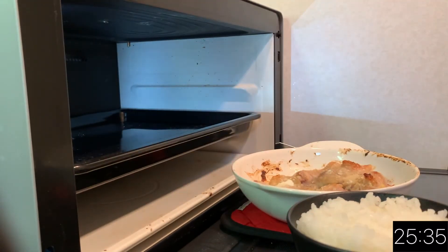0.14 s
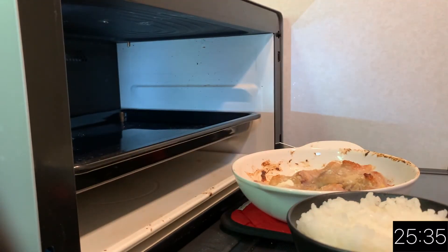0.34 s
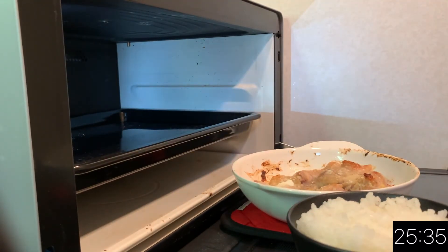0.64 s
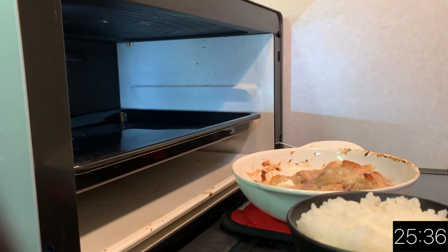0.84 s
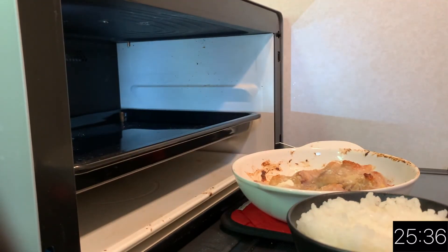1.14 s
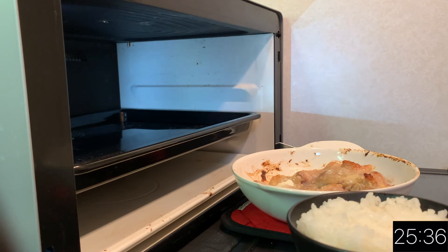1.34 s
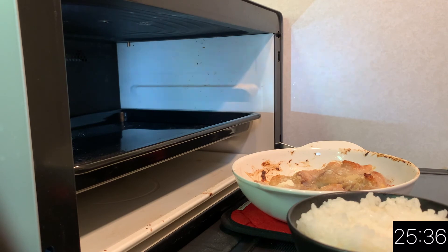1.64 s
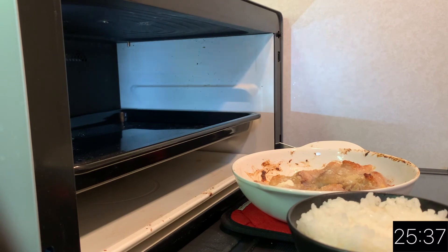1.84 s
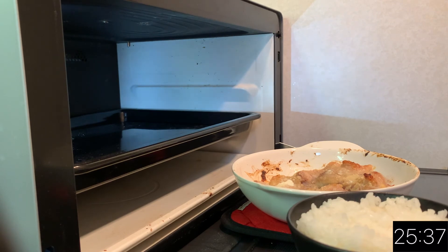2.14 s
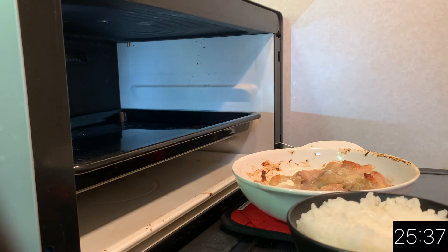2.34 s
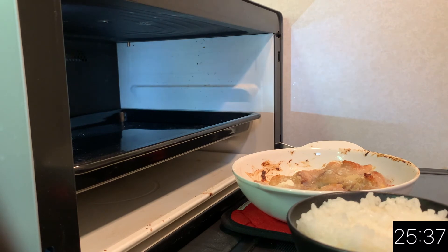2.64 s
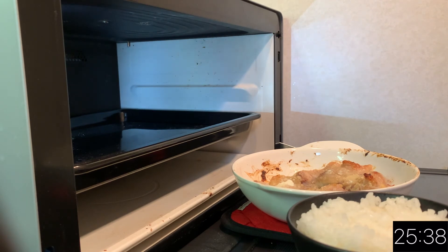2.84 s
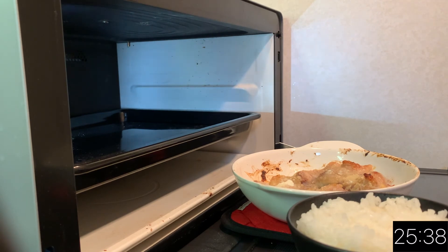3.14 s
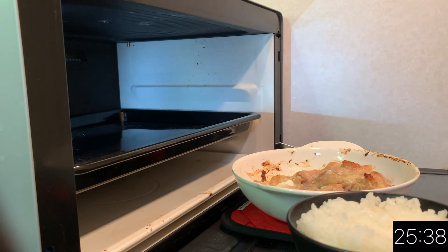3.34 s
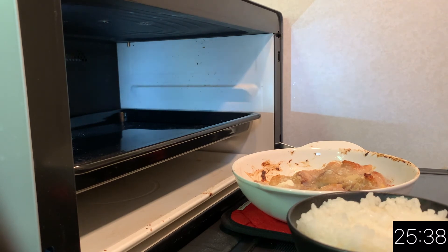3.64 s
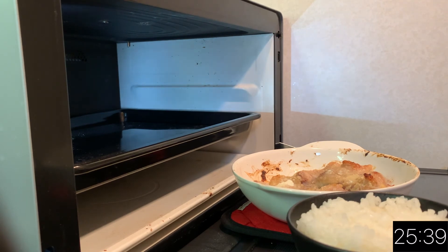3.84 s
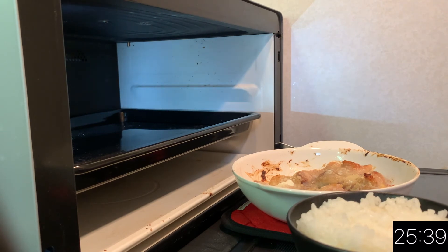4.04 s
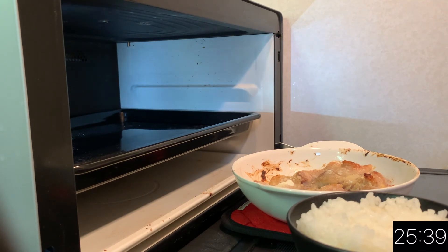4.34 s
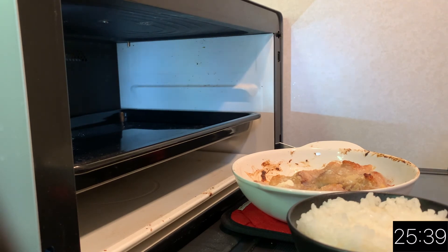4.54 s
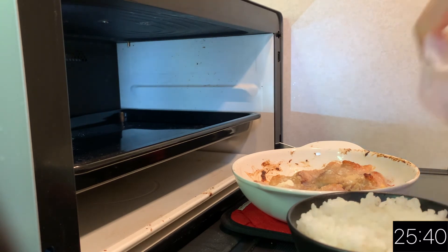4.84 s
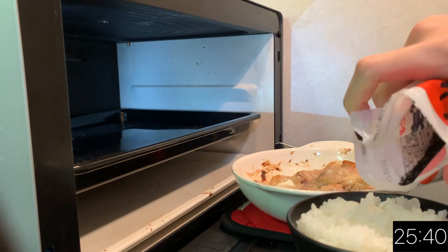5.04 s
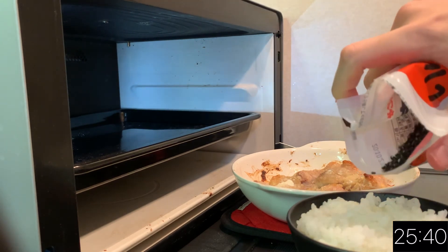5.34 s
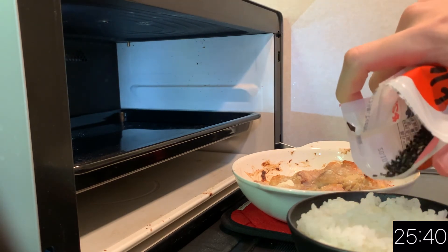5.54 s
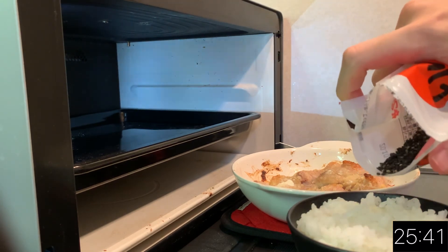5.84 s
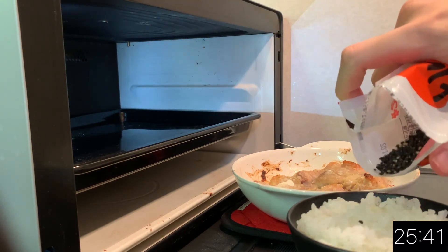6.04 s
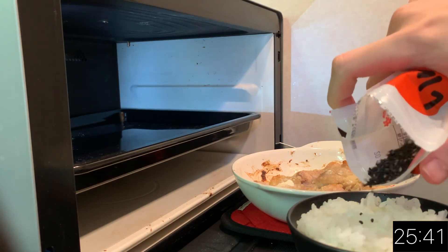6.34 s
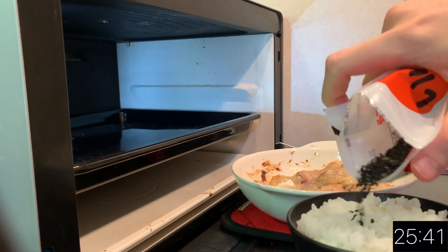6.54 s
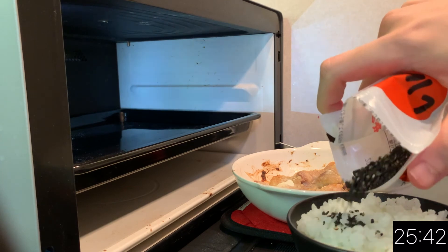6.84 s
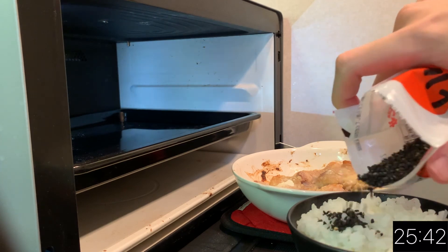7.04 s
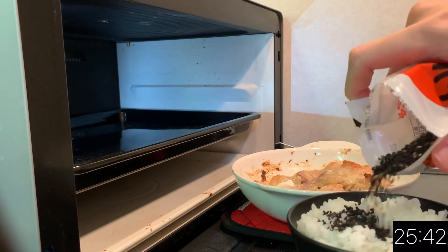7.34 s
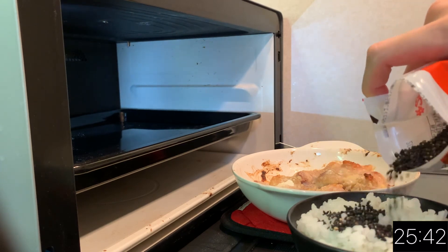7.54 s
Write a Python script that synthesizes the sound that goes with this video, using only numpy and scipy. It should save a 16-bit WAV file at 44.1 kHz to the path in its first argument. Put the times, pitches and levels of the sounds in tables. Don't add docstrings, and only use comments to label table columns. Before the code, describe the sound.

Crisp plastic film snaps, pops and gets crumpled hard, followed by faint shaking of dry seasoning, with low motor hum and fan noise behind.

```python
import sys
import numpy as np
from scipy import signal
from scipy.fft import rfft, irfft, next_fast_len
from scipy.io import wavfile
from scipy.ndimage import uniform_filter1d, minimum_filter1d

SR = 44100
rng = np.random.default_rng(int(sys.argv[2]) if len(sys.argv) > 2 else 0)


def master_out(mix):
    frames = np.transpose(np.atleast_2d(mix))
    ceiling = np.clip(frames, -1, 1)
    pcm = np.round(ceiling * 32767).astype(np.int16)
    wavfile.write(sys.argv[1], SR, pcm)


def invert_db(x):
    u = np.asarray(x, float) / 20
    return 10 ** u


N = 338688
POUR_FROM_S = 4.78


def rms_one(x):
    return x / np.sqrt(np.mean(x ** 2) + 1e-20)


def in_time(rows):
    s, *columns = np.transpose(rows)
    return [np.interp(np.arange(N) / SR, s, c) for c in columns]


def at_hz(points, hz):
    point_hz, value = np.array(points)[:, 0], np.array(points)[:, 1]
    return np.interp(np.log(hz), np.log(point_hz), value)


def drift(rate_hz):
    r = np.exp(-80 * np.pi * rate_hz / SR)
    white = rng.standard_normal(N // 40 + 2002)
    slow = signal.lfilter([1], [1, -2 * r, r * r], white)[2000:]
    return np.interp(np.arange(N) / 40, np.arange(len(slow)), rms_one(slow))


def ring(clicks, hz, t60):
    r, w = invert_db(-60 / (t60 * SR)), 2 * np.pi * hz / SR
    return signal.lfilter([0, np.sin(w)], [1, -2 * r * np.cos(w), r * r], clicks + 1e-18)


def band(x, low_hz, high_hz):
    edges = [low_hz, min(high_hz, .45 * SR)]
    return signal.sosfilt(signal.butter(2, edges, "band", fs=SR, output="sos"), x)


def stereo_bands(size, low_hz, likeness):
    edges = low_hz * 2 ** np.arange(0, np.log2(17000 / low_hz) + .5, .5)
    white = rng.standard_normal((2, 2, size))
    for k, (low, high) in enumerate(zip(edges, edges[1:])):
        mid, side = band(white[k % 2], low, high)
        hz = np.sqrt(low * high)
        alike = np.clip(at_hz(likeness, hz), -1, 1)
        yield hz, np.sqrt(1 + alike) * mid + np.sqrt(1 - alike) * side * [[1], [-1]]


def panned(x, db):
    return x * np.array([invert_db(db / 2), invert_db(-db / 2)]).reshape(2, -1)


# frequency in Hz, level in dB per Hz.
FAN_SPECTRUM = [(30, 6.5), (50, 1), (90, 1.5), (130, 0.5), (170, -2.5), (250, -5.5), (370, -1), (560, -31),
                (720, -10), (1200, -11), (1500, -17.5), (1900, -28.5), (4000, -27), (9000, -86),
                (16000, -93)]
# frequency in Hz, likeness from -1 to 1.
FAN_LIKENESS = [(40, 0.98), (90, 0.89), (150, 0.84), (280, 0.82), (500, 0.28), (1000, 1), (2380, -0.45),
                (8000, -0.1)]
# frequency in Hz, left over right in dB.
FAN_BALANCE = [(60, 2), (180, 2.5), (300, 3), (550, -8.5), (1200, -0.5), (4970, -1), (15000, -2)]


def fan():
    out = 0
    for hz, pair in stereo_bands(N, 26.97, FAN_LIKENESS):
        lean_db = at_hz(FAN_BALANCE, hz) / 2
        flicker_db = 2.14 * drift(25.0)
        out = out + pair * invert_db(at_hz(FAN_SPECTRUM, hz) + flicker_db) * invert_db([[lean_db], [-lean_db]])
    return invert_db(-47.5) * rms_one(out)


# frequency in Hz, width in Hz, rms level in dB.
DUCTS = [(399, 27, -70.5), (713.8, 39, -58), (1026, 9.9, -62.5), (1160, 8.7, -90), (1250, 8.4, -75),
         (2230, 24, -72)]


def ducts():
    white = rng.standard_normal((2, N))
    sung = sum(invert_db(db) * rms_one(ring(white, hz, 2.7 / width_hz)) for hz, width_hz, db in DUCTS)
    return np.array([0.59 * sung[0] + .5 * sung[1], 0.69 * sung[1] - 0.064 * sung[0]])


# frequency in Hz, left in dB, right in dB, left lead in radians.
MOTOR_TONES = [(191.9, -47, -53, -1.1), (319.6, -55, -57, .1), (335.85, -63, -63, -.1),
               (671.7, -67, -67, .6), (1343.2, -64, -61, .5)]
# time in seconds, left in dB, right in dB, left lead in radians.
SECOND_MOTOR = [(0, -52, -63, 3.6), (1.3, -53, -66, 3.4), (2.9, -57, -59, 3.0), (3.7, -55, -57, 1.7),
                (4.5, -49.5, -56, 1.1), (5.3, -47.5, -55, .8), (7.68, -47, -54.5, .6)]


def motors():
    first_throb_s, second_hz = .049, 182.62
    t = np.arange(N) / SR - first_throb_s
    out = np.zeros((2, N))
    for hz, left_db, right_db, lead in [*MOTOR_TONES, (second_hz, *in_time(SECOND_MOTOR))]:
        phase = 2 * np.pi * hz * t
        sway = np.sqrt(2) * invert_db(.4 * drift(.6))
        out += sway * [invert_db(left_db) * np.cos(phase), invert_db(right_db) * np.cos(phase - lead)]
    return out


BUMP_S = [1.772, 1.812, 1.945, 1.724, 1.112, 1.175, 1.19]
# frequency in Hz, peak in dB, t60 in seconds.
BUMP_RINGS = [
    (57.4, -22, 0.16),
    (50, -29, 0.15),
    (53.3, -39, 0.18),
    (650, -37.5, 0.15),
    (89, -40.5, 0.078),
    (378, -31, 0.12),
    (101, -32, 0.064),
]


def bumps():
    out = np.zeros(N)
    for s, (hz, db, t60) in zip(BUMP_S, BUMP_RINGS):
        push = np.hanning(round(.5 * SR / hz))
        rung = ring(np.pad(push, (0, SR // 2)), hz, t60)
        i = round(s * SR)
        out[i:i + len(rung)] += invert_db(db) * rung / np.abs(rung).max()
    return panned(out, 3.0)


# frequency in Hz, likeness from -1 to 1.
ECHO_LIKENESS = [(300, .2), (700, -.7), (1500, -.5), (3000, -.1), (6500, .6), (15000, .75)]
# frequency in Hz, t60 in seconds.
KITCHEN_T60 = [(300, 0.022), (2000, 0.23), (6000, 0.11), (15000, 0.0098)]


def echo_pattern():
    t = np.arange(round(.4 * SR)) / SR
    onset = np.clip((t - .0015) / 0.000073, 0, 1)
    bands = stereo_bands(len(t), 249.4, ECHO_LIKENESS)
    tail = onset * sum(pair * invert_db(-60 * t / at_hz(KITCHEN_T60, hz)) for hz, pair in bands)
    tail = tail + 1.8 * tail * np.exp(-t / .006)
    return tail / np.sqrt(np.sum(tail ** 2) / 2)


def kitchen(x):
    place = (np.arange(N) // round(.06 * SR)) % 4
    out = 0
    for k in range(4):
        here = (x * (place == k))[None]
        out = out + signal.fftconvolve(here, echo_pattern(), axes=1)[:, :N]
    return out


# peak in seconds, crackle in dB, rise
# in ms over 20 dB, fall in ms over 20 dB.
SQUEEZES = [(.01, -47.5, 96, 63), (0.171, -44, 65, 115), (.44, -50, 56, 114), (.56, -49.5, 130, 104),
            (.625, -50, 40, 82), (.735, -53.5, 28, 77), (0.886, -42.5, 14, 48), (1.02, -55, 50, 55),
            (1.11, -38.5, 106, 122), (1.188, -32, 134, 99), (1.36, -50, 69, 85), (1.49, -51.5, 72, 87),
            (1.64, -50, 110, 114), (1.731, -36.5, 30, 120), (1.86, -53, 37, 85), (1.95, -49.5, 27, 188),
            (2.13, -64, 500, 102), (2.232, -46, 13, 173), (2.379, -55, 40, 111), (2.605, -57.5, 51, 61),
            (2.736, -46.5, 27, 110), (2.86, -48, 16, 63), (2.96, -55.5, 58, 80),
            (3.045, -33.5, 25, 40), (3.079, -37, 46, 120), (3.167, -46, 47, 48), (3.2, -44, 200, 170),
          (3.35, -39, 70, 280), (3.481, -39.5, 52, 163), (3.62, -50.5, 81, 210), (3.76, -41, 76, 140),
          (3.929, -37, 12, 40), (3.945, -36.5, 37, 112), (4.02, -51, 40, 180), (4.09, -44.5, 23, 160),
          (4.19, -42.5, 59, 28), (4.249, -34, 44, 102), (4.389, -36.5, 24, 13), (4.448, -44.5, 100, 300),
          (4.559, -43, 160, 36), (4.69, -53, 30, 48)]
# start in seconds, crackle in dB, seconds sliding.
SHAKES = [(4.78, -44.5, 0.15), (4.879, -49.5, 0.3), (5.231, -52.5, 0.3), (5.619, -59, 0.15),
          (5.901, -55.5, 0.16), (6.078, -52, 0.11), (6.28, -56.5, 0.037), (6.461, -51, 0.35),
          (6.822, -56.5, 0.13), (7.07, -53.5, 0.095), (7.231, -53, 0.13), (7.45, -59, 0.13),
          (7.61, -58, .1)]


def effort():
    settle_power = 1.29
    rise_db_per_s, sag_db_per_s, fall_db_per_s = 380, 18, 192
    t = np.arange(0, N, 32) / SR
    squeeze, slide = 0, 0
    for s, db, rise_ms, fall_ms in SQUEEZES:
        before = np.maximum(s - t, 0) * 1000 / rise_ms
        after = np.maximum(t - s, 0) * 1000 / fall_ms
        squeeze = squeeze + invert_db(db - 20 * (before + after ** settle_power)) ** 2
    for s, db, length in SHAKES:
        rise_db = rise_db_per_s * np.maximum(s - t, 0)
        sag_db = sag_db_per_s * np.clip(t - s, 0, length)
        fall_db = fall_db_per_s * np.maximum(t - s - length, 0)
        slide = slide + invert_db(db - rise_db - sag_db - fall_db) ** 2
    return [np.interp(np.arange(N) / SR, t, np.sqrt(power)) for power in (squeeze, slide)]


def crackle(pitches, per_s, spread_db, cycles):
    pouring = np.arange(N) > POUR_FROM_S * SR
    evenness, crowd = np.where(pouring, .45, 1), np.where(pouring, 4, 1)
    sizes_db = evenness * spread_db * np.minimum(rng.exponential(1, N), 4)
    sizes = invert_db(sizes_db) * rng.choice([-1, 1], N)
    born = rng.random(N) < crowd * per_s * invert_db(5 * evenness * drift(30)) / SR
    dealt = rng.integers(0, len(pitches), N)
    out = 0
    for k, hz in enumerate(pitches):
        rung = ring(sizes * born * (dealt == k), hz, cycles / hz)
        out = out + hz ** 0.81 * panned(rung, rng.normal(0, 2.5))
    return rms_one(out)


def handling():
    squeeze, slide = effort()
    pouring = np.arange(N) > POUR_FROM_S * SR
    still_db = -84
    crackle_db = 10 * np.log10(squeeze ** 2 + slide ** 2 + invert_db(still_db) ** 2)
    body_db = np.where(pouring, -6, -5.5) + 0.022 * (crackle_db + 50)
    seed_db = np.where(pouring, 1, -1.5) + np.where(pouring, 0.067, 0.6) * (crackle_db + 50)
    film_db = np.where(pouring, -2.0, 0)
    body = crackle([1600, 2100, 2200, 2550, 3000], 400, spread_db=5, cycles=13)
    film_hz = [3250, 4100, 4650, 5300, 6600, 7300, 7900, 8500, 8800, 9100]
    film = crackle(film_hz, 1500, spread_db=4.2, cycles=11)
    seed_hz = [10300, 11600, 12500, 13100, 13800, 14600, 15600]
    seeds = crackle(seed_hz, 2400, spread_db=4, cycles=12)
    fine = invert_db(body_db) * body + invert_db(film_db) * film + invert_db(seed_db) * seeds
    rub = crackle(np.geomspace(250, 1300, num=6), 700, spread_db=3.5, cycles=7.2)
    rub = band(rub, 138, 2000) * [[.8], [1.15]]
    resting = invert_db(np.where(pouring, -54, -48.5))
    drag = np.hypot(resting, invert_db(3) * squeeze)
    return invert_db(crackle_db - 5) * fine + invert_db(-7.0) * drag * rub


# time in seconds, peak in dB, ring in Hz.
POPS = [(1.084, -16, 1560), (1.103, -14, 1450), (1.1183, -11, 1610), (1.1302, -14, 2180),
        (1.142, -17, 1900), (1.1548, -25, 2150), (1.1824, -11, 2180), (1.1887, -5, 2150),
        (1.214, -24, 2580), (1.2316, -21.5, 2150), (1.2486, -17, 1980), (3.043, -12.5, 2380),
        (3.0674, -31, 2320), (3.2244, -36, 2200), (3.2374, -26, 2230), (3.306, -36, 2290),
        (3.3553, -15, 2380), (3.3638, -14, 2250), (3.4007, -20, 1320), (3.4022, -15, 2580),
        (3.4565, -8, 2430), (3.491, -12, 2230), (3.4989, -20, 2220), (3.5074, -37, 2250),
        (3.5134, -30, 2180), (3.5487, -13, 1290), (3.6064, -20, 2230), (3.67, -22, 1720),
        (3.716, -27, 1350), (3.746, -28, 2510), (3.9365, -29, 2540), (3.9425, -12, 1830),
        (3.9693, -11.5, 1660), (3.986, -15, 1860), (4.047, -25, 2200), (4.1829, -15.5, 2240),
        (4.2128, -25, 2180), (4.2341, -8.5, 1900), (4.372, -28, 1840), (4.3844, -15, 1750),
        (4.5044, -38, 2850)]


def pops():
    push_s, t60_s = 0.0011, 0.0098
    out, t = np.zeros((2, N + 1024)), np.arange(1024) / SR
    for (s, db, hz), side in zip(POPS, rng.standard_normal(len(POPS))):
        pop = (1 - np.exp(-t / push_s)) * invert_db(-60 * t / t60_s) * np.sin(2 * np.pi * hz * t)
        i = round(s * SR)
        out[:, i:i + len(t)] += panned(invert_db(db - 12) * pop / np.abs(pop).max(), 0.97 * side)
    return out[:, :N]


# time in seconds, peak in dB,
# ring in Hz, low ring in dB beside the peak.
SNAPS = [(0.0508, -34.5, 2500, 8), (0.0984, -35.5, 6350, 7), (0.1447, -31, 4700, -22),
         (0.17, -34, 5950, -32), (0.2239, -36.5, 3680, -4), (0.4186, -40, 4400, 8),
         (0.4492, -34.5, 2410, 11), (0.4385, -33, 4470, -3), (0.532, -44, 4800, 9),
         (0.6185, -21, 9150, -17), (0.7103, -38.5, 3900, 0), (0.7305, -23, 11100, -5.5),
         (0.8876, -33, 4650, 5), (0.9892, -42, 4700, -15.5), (1.0126, -56, 4750, -27),
         (1.0128, -60, 4680, 10), (1.0508, -30, 11400, -14), (1.0553, -41, 4690, -10),
           (1.0687, -27, 5040, 2), (1.0953, -24, 7850, 0), (1.1157, -22, 2400, -4),
           (1.155, -14, 10700, -3.5), (1.1893, -7, 5000, -9.5), (1.2313, -25, 2630, -19),
           (1.2483, -34, 4170, -8), (1.4658, -30.5, 10500, 1), (1.4865, -21.5, 10700, -6),
           (1.5813, -34, 5600, -9), (1.6604, -31, 2900, -10), (1.682, -32, 7100, -18),
           (1.7248, -24, 3500, -23), (1.7781, -28, 7900, -1), (1.8827, -36, 3720, -9),
           (1.9395, -31.5, 4230, -28), (1.9933, -30, 3460, -18), (2.1613, -33, 4360, -1),
           (2.2217, -24, 10600, -16), (2.258, -38, 5840, -21), (2.3017, -29, 6100, -2),
           (2.3717, -34, 4800, 0), (2.4505, -49, 2580, 11), (2.6, -38, 9600, -26),
           (2.7248, -26, 11200, -29), (2.8462, -25, 5850, -15), (2.9449, -32, 2500, 2),
           (2.9967, -32, 2700, -6),
         (3.0395, -14, 7500, -24), (3.0438, -11.5, 9050, -12), (3.0732, -11.5, 11700, -21),
             (3.1625, -23.5, 5030, -15), (3.2012, -24, 3400, -16), (3.2189, -25, 3530, 3),
             (3.2995, -27.5, 2700, -23), (3.3265, -26, 4520, -17), (3.3443, -13.5, 10900, -16),
             (3.4015, -21, 4800, -19), (3.4567, -11.5, 6560, -14), (3.4672, -37, 8900, -16),
             (3.4895, -19.5, 11700, -8), (3.4985, -29, 11000, -12), (3.5072, -11, 6860, -0.5),
             (3.551, -31, 2960, 9), (3.607, -34.5, 2650, 10), (3.6005, -31, 6400, 0),
             (3.6328, -25.5, 6300, 1.5), (3.7167, -36, 4400, -3), (3.6951, -37, 2440, 12.5),
             (3.7432, -27, 2380, -19), (3.7568, -13.5, 2330, -24), (3.8626, -25, 5970, -0.5),
         (3.9007, -16, 6200, -9), (3.9287, -19, 7110, 3.5), (3.9325, -28, 10500, -10),
            (3.9412, -9, 12000, -7), (3.9686, -15, 4860, -4.5), (4.048, -29, 2580, 3),
            (4.0804, -13, 10700, -13), (4.0879, -9, 6880, -15.5), (4.1685, -25, 6230, 4),
            (4.181, -33, 2410, -12), (4.2111, -28, 2600, -2), (4.234, -16.5, 6400, -3),
            (4.246, -12, 2800, -47), (4.3486, -21, 7760, -8), (4.3848, -19.5, 6750, 3),
            (4.4325, -13.5, 6400, -8.5), (4.4484, -16.5, 7300, 2), (4.5049, -36, 8640, -12),
            (4.5223, -28, 7040, -3), (4.5548, -19.5, 2800, -9), (4.569, -18.5, 10900, -19),
            (4.683, -18, 8200, -16), (4.7548, -22.5, 8400, -4),
         (5.231, -49, 9060, -15), (5.513, -36.5, 9200, -16), (5.6234, -34.5, 4120, -4),
           (5.894, -44, 7600, -10), (5.99, -38, 7150, -8), (5.9906, -26.5, 7600, 1),
           (7.0489, -55, 7050, -8), (7.1318, -33, 7400, -8), (7.232, -53, 8310, -10),
           (7.5297, -41, 8700, -6),
         (1.1835, -18, 5030, -1), (1.193, -34, 4340, -11), (1.198, -31, 8100, -16),
            (1.2165, -44, 4500, -14), (3.047, -14, 9050, -24), (3.0505, -10, 8050, -28),
            (3.082, -17, 4940, -15), (3.0885, -22.5, 4000, -33), (3.1215, -28, 5700, -20),
            (3.239, -32, 6200, 3), (3.3575, -17, 4700, -9), (3.4995, -21, 6400, 4), (3.993, -25, 5900, 2),
            (4.251, -18.5, 6240, -25), (4.259, -29, 3560, -29)]


def snaps():
    rows = SNAPS
    size = 1024
    aftershocks_per_s, aftershock_size, aftershock_s = 800.0, 0.33, 0.0077
    flip_rise_s, flip_s = 0.00019, .00025
    out, age = np.zeros((2, N + size)), np.arange(size) / SR
    struck = rng.random((len(rows), size)) < aftershocks_per_s / SR
    kicks = struck * rng.random((len(rows), size)) * aftershock_size * np.exp(-age / aftershock_s)
    kicks[:, 0] = 1
    force = signal.lfilter([1], [1, -np.exp(-1 / (flip_s * SR))], kicks)
    force = force * np.minimum(age / flip_rise_s + .2, 1)
    chance = rng.standard_normal((len(rows), 2))
    noise = rng.standard_normal((len(rows), 3, 3, size))
    slips = (noise[:, :, :1] + .9 * noise[:, :, 1:]) * force[:, None, None]
    for (s, db, hz, low_db), slip, (shape, side) in zip(rows, slips, chance):
        patch = ring(slip[0], hz, 0.0031) + 2.85 * band(slip[0], 2880, 9100)
        body = ring(slip[1], 2200 * invert_db(.7 * shape), .006) + 3 * band(slip[1], 1400, 3200)
        fizz = band(slip[2], 9800, 16000)
        thud = band(slip[1], 400, 1400)
        fizz_db = -5.5 + 3.5 * np.log2(hz / 5000) + 0.5036 * (db + 30.5)
        gains = invert_db([db + 4.5, db + low_db, db + fizz_db, db - 14.5])
        snap = sum(g * p / np.abs(p).max() for g, p in zip(gains, [patch, body, fizz, thud]))
        snap = snap * gains.max() / np.abs(snap).max()
        i = round(s * SR)
        out[:, i:i + size] += panned(snap, -.3 + 3.5 * side)
    return out[:, :N]


def ports(x):
    lag_s, lag_below_hz = .00045, 5000
    low = signal.sosfiltfilt(signal.butter(3, lag_below_hz, fs=SR, output="sos"), x[0])
    return np.array([x[0] - low + np.roll(low, round(lag_s * SR)), x[1]])


def scene():
    snap, pop, rustle = band(snaps(), 480, 17000), pops(), handling()
    sent = invert_db(-3) * snap.mean(axis=0) + invert_db(-8.5) * pop.mean(axis=0) + invert_db(2.5) * rustle[0]
    packet = ports(snap + pop + rustle) + kitchen(sent)
    return packet + bumps() + motors() + fan() + ducts()


def starved(x):
    above_hz, ahead_s, rise_db, cut_db = 3000, .012, 15, -26
    treble = signal.sosfilt(signal.butter(2, above_hz, "high", fs=SR, output="sos"), x)
    power = uniform_filter1d(np.mean(treble ** 2, axis=0), size=96)
    level_db = 10 * np.log10(power + 1e-12)
    span = round(ahead_s * SR)
    coming_db = -minimum_filter1d(-level_db, size=span, origin=-(span // 2))
    share = np.clip((coming_db - level_db - rise_db) / 6, 0, 1)
    return x - (1 - invert_db(cut_db * uniform_filter1d(share, size=48))) * treble


# low edge in Hz, high edge in Hz, share of the time in crackle, share in even hiss.
DROPOUTS = [(9150, 10100, .45, .75), (10500, 10850, .06, .15), (11800, 12200, .1, .25),
            (12400, 12950, .22, .5), (12950, 13500, .2, .55), (13500, 14000, .08, .25),
            (14000, 14700, .15, .25), (14700, 15100, .08, .12), (15400, 16300, .25, .25)]


def dropped(x):
    size = next_fast_len(N)
    spectrum, hz = rfft(x, size), np.arange(size // 2 + 1) * SR / size
    even, out = np.arange(N) > POUR_FROM_S * SR, x.copy()
    for low_hz, high_hz, share, even_share in DROPOUTS:
        luck = .5 + .5 * np.tanh(.85 * drift(7))
        off = uniform_filter1d(1. * (luck < np.where(even, even_share, share)), size=800)
        inside = (hz > low_hz) & (hz < high_hz)
        out -= off * irfft(spectrum * inside, size)[:, :N]
    return out


def low_pass(x):
    return signal.sosfilt(signal.butter(12, 16970, fs=SR, output="sos"), x)


# frequency in Hz, width in Hz, depth in dB.
TREBLE_DIPS = [(9650, 600, -5), (10850, 600, -3)]


def record(dry):
    x = signal.sosfilt(signal.butter(5, 41, "high", fs=SR, output="sos"), dry)
    for hz, width_hz, db in TREBLE_DIPS:
        x = x - (1 - invert_db(db)) * signal.lfilter(*signal.iirpeak(hz, hz / width_hz, fs=SR), x)
    x = signal.sosfilt(signal.cheby2(16, 45, 16200, fs=SR, output="sos"), x)
    return low_pass(dropped(starved(x)))


dry = scene()
out = record(dry)
master_out(out)
```